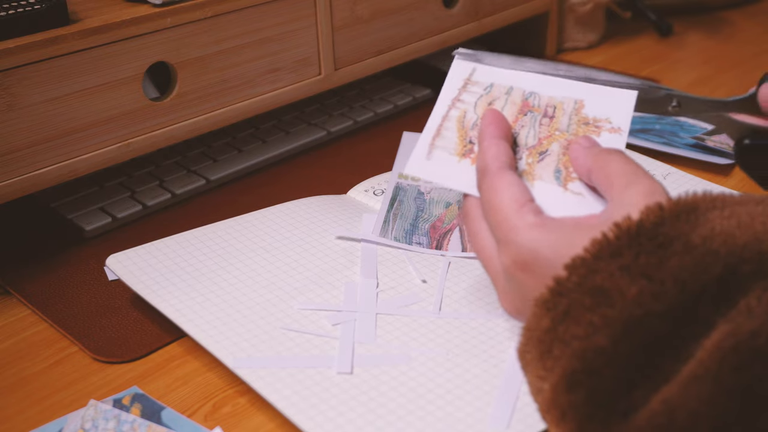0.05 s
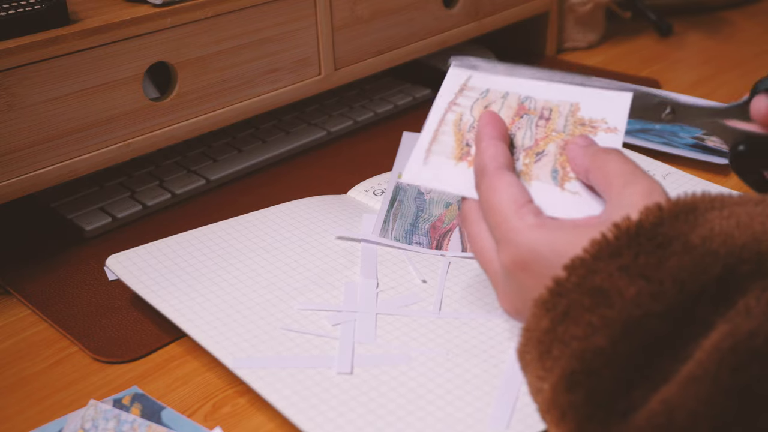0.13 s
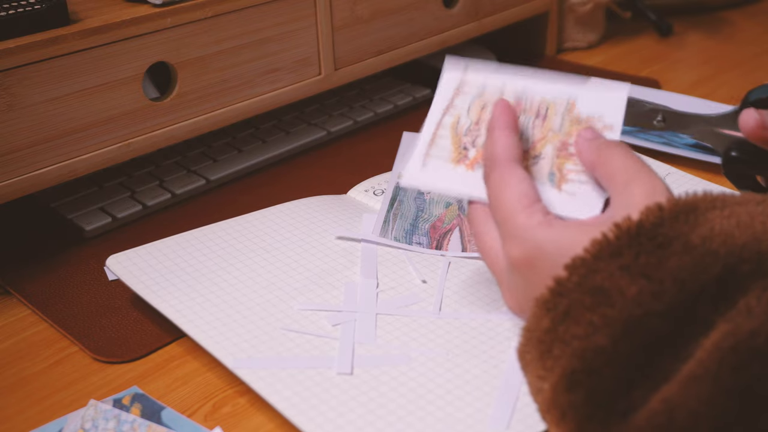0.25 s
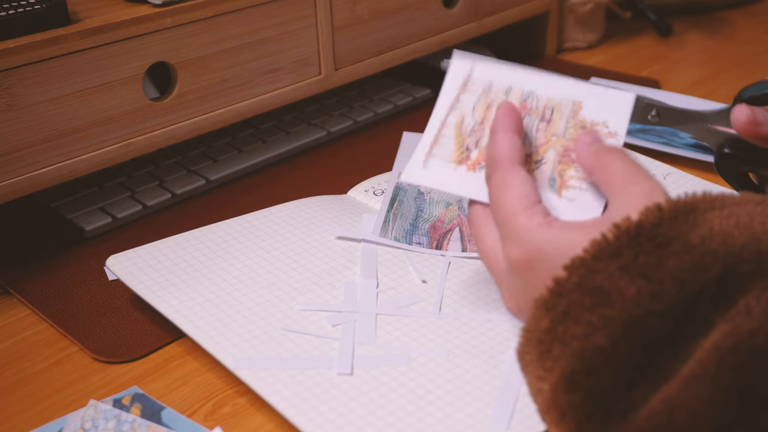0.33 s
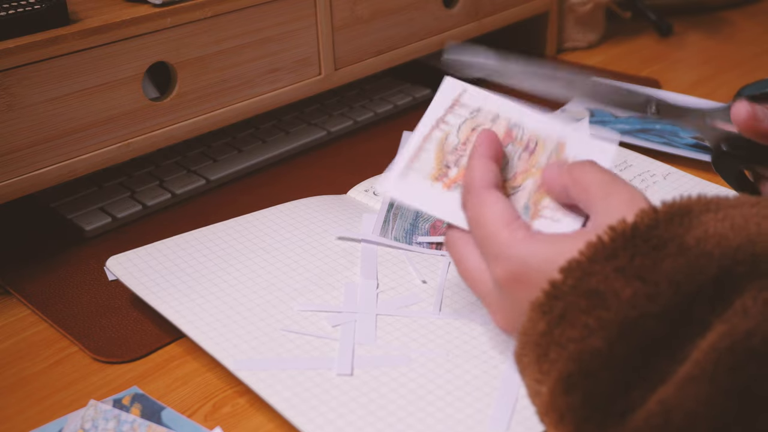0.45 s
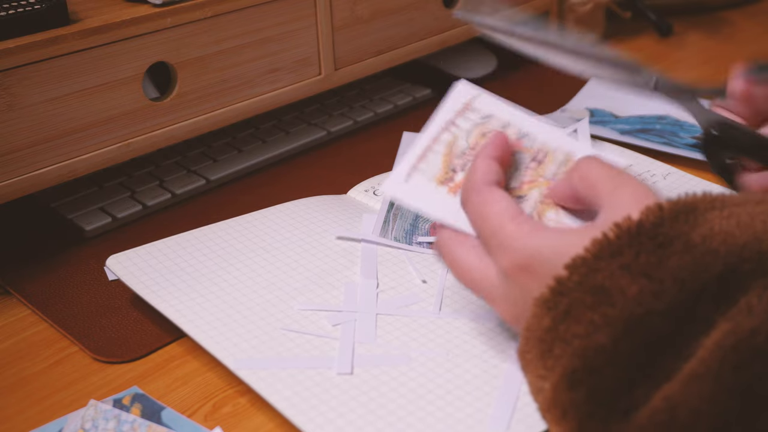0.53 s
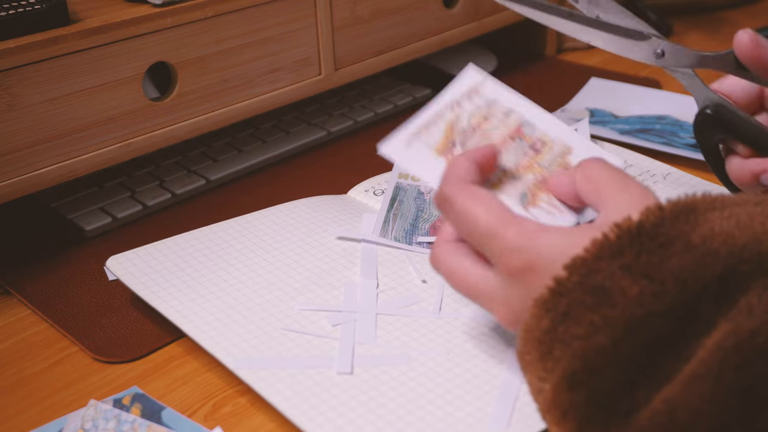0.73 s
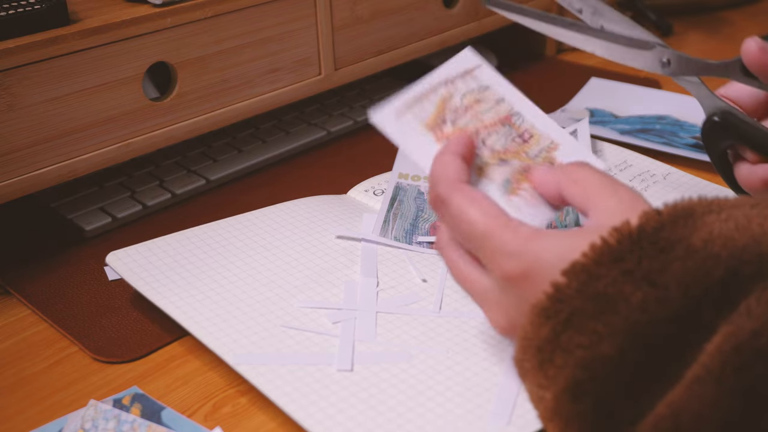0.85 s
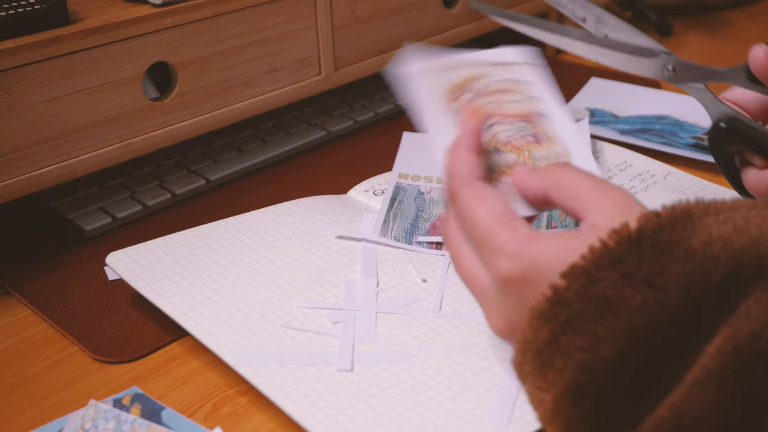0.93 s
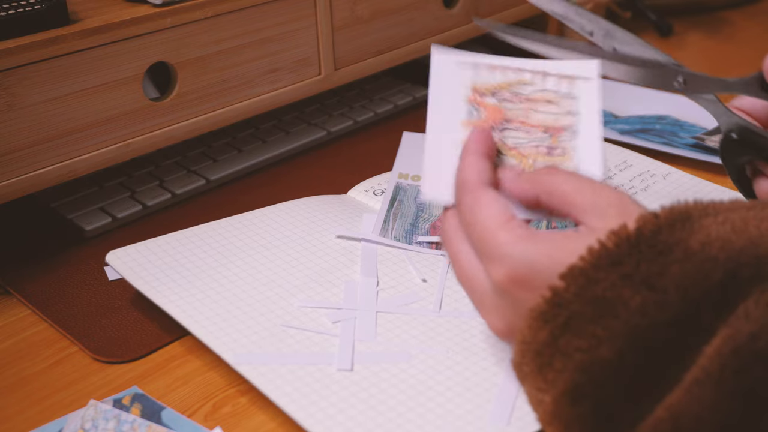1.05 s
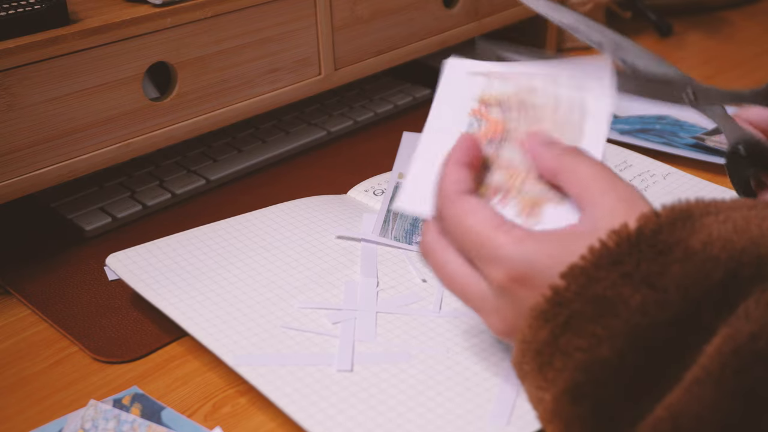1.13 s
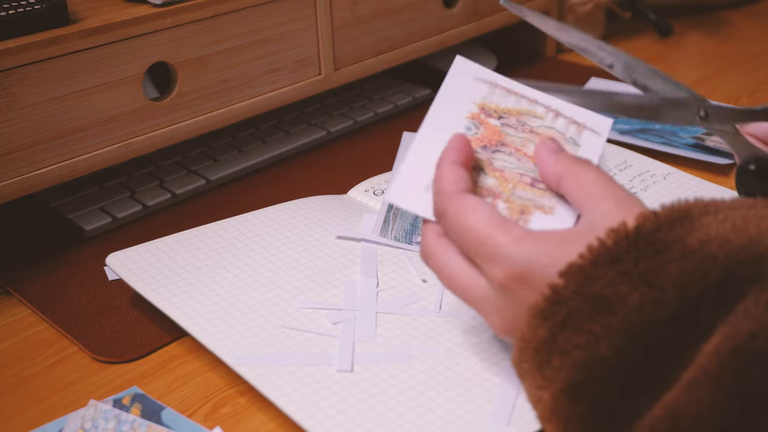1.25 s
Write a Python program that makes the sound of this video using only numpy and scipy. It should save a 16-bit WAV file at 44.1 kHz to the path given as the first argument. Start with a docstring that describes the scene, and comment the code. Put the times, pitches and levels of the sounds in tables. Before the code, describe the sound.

Close, dry-sounding scissors at a desk indoors: a brief fibrous crunch, bright shear and hard clack, then a ticking rasp as they open, a quick card swish, a small patter and soft finger rubbing.

```python
"""Above a desk in a small room, scissors finish one cut through a card, close to the microphone.
Fibres crunch, the blades shear through the edge, clack shut, grind together and rasp open.
The card swishes off them, the offcut patters down and fingers turn the card.
Rubbing is noise and tiny random slips, knocks are short pushes; both ring coloured bodies.
Sources get early reflections and a room tail; soft hand noises and a quiet room floor lie beneath."""
import sys
import numpy as np
from scipy import signal
from scipy.fft import rfft, irfft, next_fast_len
from scipy.io import wavfile

SR = 44100
rng = np.random.default_rng(int(sys.argv[2]) if len(sys.argv) > 2 else 0)


def to_wav(s):
    """Save 16-bit WAV."""
    ch = np.atleast_2d(s).T  # columns
    pcm = np.round(np.clip(ch, -1, 1) * 32767)  # PCM
    wavfile.write(sys.argv[1], SR, pcm.astype(np.int16))


N = 57330  # samples, 1.3 s


def amp(db):
    """Decibels to gain."""
    return 10 ** (np.asarray(db) / 20)


def unit(x):
    """Scale to rms 1."""
    return x / np.sqrt(np.mean(x ** 2) + 1e-20)


def along(points, hz):
    """Read a curve of (Hz, value) points on a log frequency axis."""
    f, v = np.transpose(points)
    return np.interp(np.log(hz + 1), np.log(f + 1), v)


def filtered(x, response):
    """Multiply the spectrum of x by a response of frequency."""
    m = 2 * next_fast_len(N // 2 + 2048)  # even length with padding for the ringing
    spectrum = rfft(x, m) * response(np.fft.rfftfreq(m, 1 / SR))
    return irfft(spectrum, m)[..., :N]


def body(x, tone):
    """Ring x through a causal minimum-phase colour of unit power, falling away below its first point."""
    def response(hz):
        bass_fall = np.clip(hz / tone[0][0], 1e-2, 1)
        gain = amp(along(tone, hz)) * bass_fall
        cepstrum = irfft(np.log(unit(gain)))
        half = len(cepstrum) // 2
        cepstrum[1:half] *= 2  # fold to minimum phase
        cepstrum[half + 1:] = 0
        return np.exp(rfft(cepstrum))
    return filtered(x, response)


ONSET_DB = 23.5  # rise over the attack


def envelope(strokes):
    """Sum every stroke's swell, its hold that sags (or rises, if negative) and its decay, straight in dB."""
    t, total = np.arange(N) / SR, np.zeros(N)
    for start, attack, hold, release, db, sag_db in strokes:
        u = t - start - attack  # time since the attack ended
        rise = ONSET_DB * np.minimum(u / attack, 0)
        sag = sag_db * np.clip(u / hold, 0, 1)
        fall = 20 * np.maximum(u - hold, 0) / release
        total += amp(db + rise - sag - fall)
    return total


def slipping(strokes, rate, scatter_db, smooth):
    """Force of tiny slips of random size and sign, rate a second, over smooth rubbing noise."""
    size = amp(scatter_db * np.clip(rng.standard_normal(N), -2, 2))
    slips = (rng.random(N) < rate / SR) * size * rng.choice([-1, 1], N)
    rubbing = unit(slips) + smooth * rng.standard_normal(N)
    return unit(rubbing) * envelope(strokes)


def friction(strokes, tone, rate, scatter_db, smooth):
    """Slips of the rubbing surfaces ring the body."""
    return body(slipping(strokes, rate, scatter_db, smooth), tone)


TICK_S = .0017  # basic length of a contact's chatter


def contacts(rows, tone, chatter_s, chatter):
    """Each contact is one push plus a brief dying chatter of noise, ringing the body."""
    t, force = np.arange(N) / SR, np.zeros(N)
    for s, db in rows:
        burst = rng.standard_normal(N) * (t >= s) * np.exp(-((t - s) / chatter_s) ** 2)
        burst *= chatter / np.linalg.norm(burst)
        burst[round(s * SR)] += 1  # the push
        force += amp(db) * burst / np.linalg.norm(burst)
    return body(force, tone)


# Left-right likeness of diffuse sound. Each row: frequency in Hz, likeness from 0 to 1.
LIKENESS = [(200, 0.82), (1000, 0.46), (4000, 0.039)]


def diffuse(pair):
    """Mix two unrelated signals as mid and side so that they grow alike in the bass."""
    def mid_side(hz):
        turn = np.arccos(np.clip(along(LIKENESS, hz), -1, 1)) / 2
        return np.array([np.cos(turn), np.sin(turn)])
    mid, side = filtered(pair, mid_side)
    return np.array([mid + side, mid - side])


# Decay of the room's tail. Each row: frequency in Hz, time to fall 60 dB in seconds.
ROOM_DECAY = [(200, 0.84), (1000, 0.088), (4000, 0.37), (10000, 0.12)]
# Phase between the microphone's two ports. Each row: frequency in Hz, lead of the left in radians.
PORT_LEAD = [(100, 1), (2200, 0.65), (4500, -1.45), (9000, -0.83)]
ROOM_DELAY_S, EARLY_S = 0.0072, 0.0066  # gap before the tail, spread of the early reflections


def placed(x, pan_db, walls_db, room_db):
    """Direct sound at both ports (positive pan is left), early reflections from the desk, the room's tail."""
    hz, t, z = signal.stft(rng.standard_normal((2, SR // 2)), SR, nperseg=256)
    decay = amp(-60 * t / along(ROOM_DECAY, hz)[:, None])
    tail = signal.istft(z * decay, SR, nperseg=256)[1]
    t = np.arange(tail.shape[1]) / SR
    tail = tail * (t > ROOM_DELAY_S)
    early = rng.standard_normal(tail.shape) * (t / EARLY_S) * np.exp(-2 * t / EARLY_S)
    answer = amp(room_db) * tail / np.linalg.norm(tail[0])
    answer = answer + amp(walls_db) * early / np.linalg.norm(early[0])
    reflected = diffuse(signal.fftconvolve(x[None], answer, axes=1)[:, :N])
    ports = np.array([[1], [-1]])
    direct = filtered(x, lambda hz: np.exp(.5j * along(PORT_LEAD, hz) * ports))
    return direct * amp(pan_db / 2 * ports) + reflected


# Colour of the quiet room. Each row: frequency in Hz, level in dB per Hz.
ROOM_FLOOR_TONE = [(25, -13), (330, 8), (1620, -7), (6570, -33), (12000, -39.5), (22000, -120)]
FLOOR_DB = -80.5


def room_floor():
    """Steady coloured noise, spread wide, is the quiet room."""
    return amp(FLOOR_DB) * unit(diffuse(body(rng.standard_normal((2, N)), ROOM_FLOOR_TONE)))


# Low stirring of the hands. Each row: start, attack and hold in seconds, release in seconds per 20 dB,
# level in dB, sag over the hold in dB. The other stroke tables share this layout.
HAND_STROKES = [(-.02, 0.014, 0.094, 0.036, -75, 18), (.25, 0.026, 0.0077, 0.03, -57.5, 3.5),
                (.43, 0.0226, 0.019, 0.092, -72, 13), (.79, 0.032, 0.11, 0.045, -76.5, 2.5),
                (1.15, 0.044, 0.042, 0.079, -75, -4.5)]
# Colour of the stirring. Each row: frequency in Hz, level in dB per Hz.
HANDLING_TONE = [(25, -23.5), (55, -25), (80, 3), (110, -6), (190, 7.5), (480, -26)]
# Soft bumps of the hands. Each row: time in seconds, energy in dB.
HAND_BUMPS = [(.458, -35.5), (.75, -35.5), (.934, -44.5), (1.122, -37)]
# Colour of the bumps. Each row: frequency in Hz, level in dB per Hz.
HAND_BUMP_TONE = [(120, -13.5), (240, -25.5), (335, 7.5), (460, -30.5), (1000, -66)]


def hands():
    """Hands and sleeve stir as wide low noise and bump softly in the centre."""
    stirring = unit(diffuse(body(rng.standard_normal((2, N)), HANDLING_TONE)))
    bumps = contacts(HAND_BUMPS, HAND_BUMP_TONE, chatter_s=.018, chatter=1.95)
    return envelope(HAND_STROKES) * stirring + bumps


# Blades sliding. Each row: start, attack and hold in seconds, release in seconds per 20 dB,
# level in dB, sag over the hold in dB.
BLADE_STROKES = [(-.02, 0.015, 0.094, 0.045, -54, 17.5), (.172, 0.0076, .03, 0.027, -71, -13),
                 (.6, 0.015, .1, 0.02, -48, 13), (1.0, 0.052, 0.041, 0.01, -73, 1)]
# Colour of the sliding blades. Each row: frequency in Hz, level in dB per Hz.
BLADE_SLIDE_TONE = [(500, -33.5), (1300, -4), (1700, 8), (2100, -1.5), (2700, 11), (4000, -8),
                    (10000, -21.5)]


def blade_slide():
    """The blades slide over each other as smooth friction with rapid slips."""
    slide = friction(BLADE_STROKES, BLADE_SLIDE_TONE, rate=2700, scatter_db=5, smooth=1.0)
    return placed(slide, pan_db=-0.2, walls_db=-7.5, room_db=-20)


# Card's face and edge between the fingers. Each row: start, attack and hold in seconds,
# release in seconds per 20 dB, level in dB, sag over the hold in dB.
FACE_STROKES = [(.17, 0.038, 0.013, 0.028, -63.5, -12), (.45, 0.0081, 0.087, 0.042, -64, 18),
                (.61, .02, 0.065, 0.021, -57.5, 5), (.72, .02, 0.032, 0.059, -61, -2),
                (.905, 0.028, 0.046, 0.046, -54.5, 0), (1.15, 0.04, 0.045, 0.028, -44.5, 5)]
EDGE_STROKES = [(.78, 0.048, 0.093, 0.17, -59, 11), (.93, 0.059, 0.091, 0.02, -63.5, -10),
                (1.1, 0.023, 0.02, 0.028, -75.5, 0.5)]
# Colours of face and edge. Each row: frequency in Hz, level in dB per Hz.
FACE_TONE = [(700, -17.5), (1700, 4.5), (2300, -4.5), (3800, 2.5), (7500, 5.5), (9500, 2.5), (11300, -12),
             (12600, -33.5)]
CARD_EDGE_TONE = [(900, -13), (1700, -7), (4200, -10.5), (5200, 0), (8000, 2.5), (11000, -12), (12600, -34)]


def card_slide():
    """The card's face and edge slide between fingers, a dense grain of slips in two colours."""
    grain = dict(rate=6200, scatter_db=4.5, smooth=0.81)
    face = friction(FACE_STROKES, FACE_TONE, **grain)
    edge = friction(EDGE_STROKES, CARD_EDGE_TONE, **grain)
    return placed(face + edge, pan_db=0.0, walls_db=-9, room_db=-31.5)


# The crunching cut. Each row: start, attack and hold in seconds, release in seconds per 20 dB,
# level in dB, sag over the hold in dB.
CUT_STROKES = [(.211, .012, 0.1, 0.6143, -29, 35)]
# Colour of the card being cut. Each row: frequency in Hz, level in dB per Hz.
CRUNCH_TONE = [(400, -26), (640, 3), (800, -7), (980, -15), (1170, 4.5), (1300, 8.5), (1750, -1),
               (2300, -10.5), (3100, -3.5), (4300, -18), (8000, -21.5), (12000, -55)]
# Progress of the blades along the cut. Each row: time in seconds, progress from 0 to 1.
CUT_PROGRESS = [(.225, 0.13), (0.274, 0.43)]
# A fibre snapping. Each row: time in seconds, energy in dB.
SNAPS = [(.2685, -12)]
CUT_RISE = 1.17  # frequency factor of the late colour


def crunch():
    """Breaking fibres ring the card; its colour fades towards a higher one as the uncut strip shortens."""
    fibres = slipping(CUT_STROKES, rate=1300, scatter_db=-2.5, smooth=0.7)
    progress = np.interp(np.arange(N) / SR, *np.transpose(CUT_PROGRESS))
    late_tone = [(hz * CUT_RISE, db) for hz, db in CRUNCH_TONE]
    early = body(fibres * (1 - progress), CRUNCH_TONE)
    late = body(fibres * progress, late_tone)
    snap = contacts(SNAPS, late_tone, chatter_s=TICK_S, chatter=0.33)
    return placed(early + late + snap, pan_db=-2.0, walls_db=-3.0, room_db=-7.5)


# The blades racing through the edge. Each row: start, attack and hold in seconds,
# release in seconds per 20 dB, level in dB, sag over the hold in dB.
SHEAR_STROKES = [(.279, 0.0051, 0.0058, 0.00262, -27.5, -5)]
# Colour of the shear. Each row: frequency in Hz, level in dB per Hz.
SHEARING_TONE = [(300, -34.5), (1300, 2.5), (2200, 10), (4800, -4), (5600, -3), (6600, 10.5), (7700, 2.5),
                 (9000, -10), (11000, -14.5), (13000, -54.5)]
# The card's last edge parting. Each row: time in seconds, energy in dB.
EDGE_PARTINGS = [(.2899, -12.5)]


def shear():
    """The blades race through the last edge: a short bright burst of slips, and a snap as it parts."""
    burst = friction(SHEAR_STROKES, SHEARING_TONE, rate=3000, scatter_db=5.5, smooth=0.44)
    snap = contacts(EDGE_PARTINGS, SHEARING_TONE, chatter_s=TICK_S / 2, chatter=1)
    return placed(burst + snap, pan_db=-5.5, walls_db=-34.0, room_db=-13.0)


# Handles knocking shut. Each row: time in seconds, energy in dB.
HANDLE_CLACKS = [(.2946, 1), (.3085, -7.5)]
# Blades grinding together. Each row: start, attack and hold in seconds, release in seconds per 20 dB,
# level in dB, sag over the hold in dB.
GRIND_STROKES = [(.298, 0.0069, 0.068, 0.022, -39.5, 4.6)]
# Colour of the closed scissors. Each row: frequency in Hz, level in dB per Hz.
CLOSED_TONE = [(400, -41.5), (620, -8.5), (1150, -7.5), (1800, 2.5), (2250, -6), (2800, 1.5), (3750, -16),
               (4500, 4.5), (4850, 0), (5400, -6.5), (6800, -15.5), (8000, -22.5), (10000, -54)]


def clack_and_grind():
    """The handles clack shut and the blades grind together, ringing the same body."""
    clack = contacts(HANDLE_CLACKS, CLOSED_TONE, chatter_s=TICK_S, chatter=0.79)
    grind = friction(GRIND_STROKES, CLOSED_TONE, rate=1400, scatter_db=-2.5, smooth=0.22)
    return placed(clack + grind, pan_db=0.5, walls_db=-8.5, room_db=-11)


# Blades opening. Each row: start, attack and hold in seconds, release in seconds per 20 dB,
# level in dB, sag over the hold in dB.
OPENING_STROKES = [(.436, 0.0056, 0.033, 0.036, -39.5, 0.57)]
# Colour of the opening. Each row: frequency in Hz, level in dB per Hz.
OPENING_TONE = [(550, -25), (820, 1), (1200, 6.5), (1700, -5), (2800, 5.5), (4000, -3), (5400, -6.5),
                (6400, -12.5), (12500, -56)]
# The pivot catching. Each row: time in seconds, energy in dB.
CATCHES = [(.4398, -10), (.4465, -24), (.4542, -15.5), (.4655, -11.5)]


def rasp_open():
    """The blades rasp open on sparse slips while the pivot catches in chattering ticks."""
    rasp = friction(OPENING_STROKES, OPENING_TONE, rate=700, scatter_db=1, smooth=0.27)
    catches = contacts(CATCHES, OPENING_TONE, chatter_s=2 * TICK_S, chatter=1.5)
    return placed(rasp + catches, pan_db=-0.2, walls_db=-7.5, room_db=-20)


# Card leaving the blade. Each row: start, attack and hold in seconds, release in seconds per 20 dB,
# level in dB, sag over the hold in dB.
SWISH_STROKES = [(.597, 0.015, 0.0051, 0.021, -29.5, 0.63)]
# Colour of the swish. Each row: frequency in Hz, level in dB per Hz.
SWISHING_TONE = [(900, -53.5), (1300, -15), (2000, -9.5), (2700, 0.5), (3500, -8), (6400, -2.5),
                 (8000, -12), (10300, -9.5), (13000, -40.5)]


def swish():
    """The card swishes off the blade as bright friction."""
    rub = friction(SWISH_STROKES, SWISHING_TONE, rate=2000, scatter_db=4, smooth=0.48)
    return placed(rub, pan_db=-3.0, walls_db=-4.0, room_db=-13)


# Offcut pattering. Each row: start, attack and hold in seconds, release in seconds per 20 dB,
# level in dB, sag over the hold in dB.
PATTER_STROKES = [(.718, 0.024, 0.039, 0.0063, -41, 2.53)]
# Colour of the offcut. Each row: frequency in Hz, level in dB per Hz.
OFFCUT_TONE = [(620, -32.5), (920, -2.5), (1350, 5.5), (1650, -1), (2000, -14.5), (2750, -5), (3300, -13.5),
               (5000, -24.5), (12500, -58)]
# The offcut landing. Each row: time in seconds, energy in dB.
OFFCUT_LANDINGS = [(.7408, -9)]


def patter():
    """The offcut patters down as slips of very uneven size, with one landing contact."""
    rustle = friction(PATTER_STROKES, OFFCUT_TONE, rate=1100, scatter_db=7.5, smooth=0.87)
    landing = contacts(OFFCUT_LANDINGS, OFFCUT_TONE, chatter_s=0.0038, chatter=0.84)
    return placed(rustle + landing, pan_db=-1.0, walls_db=-13.5, room_db=-11.5)


def scene():
    """Sum all sources at the microphone."""
    scissors = blade_slide() + crunch() + shear() + clack_and_grind() + rasp_open()
    card = card_slide() + swish() + patter()
    return room_floor() + hands() + scissors + card


TOP_HZ = 13000  # band limit


def record(dry):
    """The recorder keeps nothing above its band limit."""
    return filtered(dry, lambda hz: hz < TOP_HZ)


dry = scene()
out = record(dry)
to_wav(out)
```